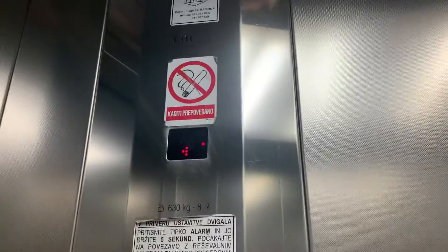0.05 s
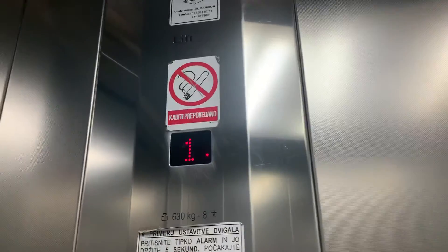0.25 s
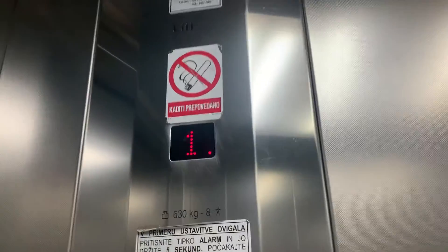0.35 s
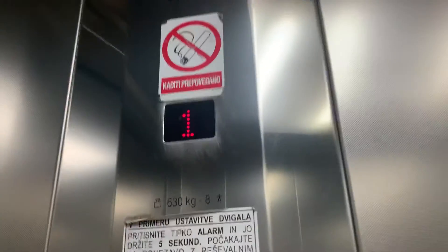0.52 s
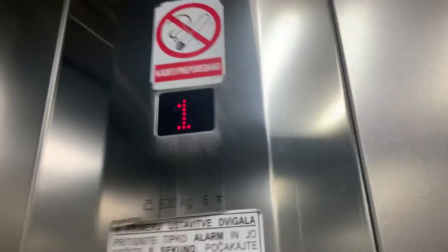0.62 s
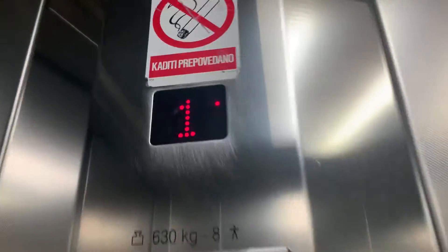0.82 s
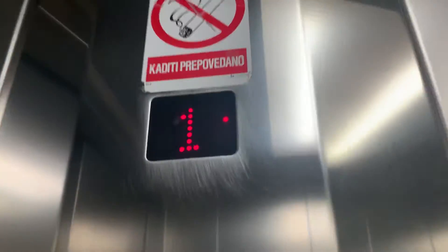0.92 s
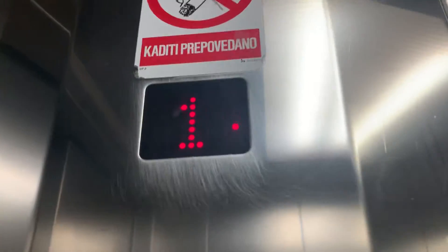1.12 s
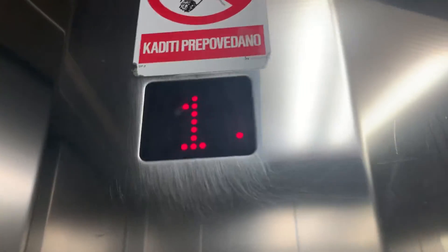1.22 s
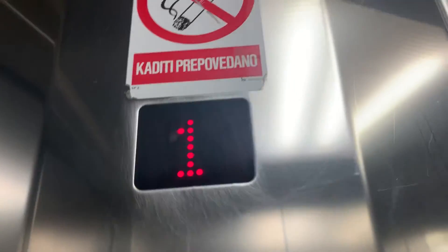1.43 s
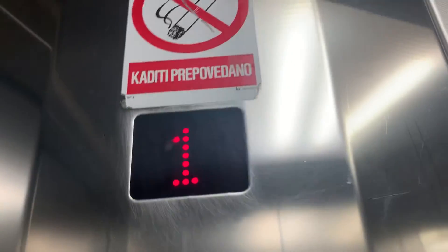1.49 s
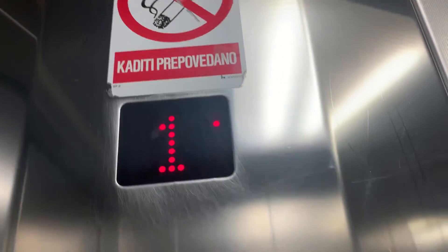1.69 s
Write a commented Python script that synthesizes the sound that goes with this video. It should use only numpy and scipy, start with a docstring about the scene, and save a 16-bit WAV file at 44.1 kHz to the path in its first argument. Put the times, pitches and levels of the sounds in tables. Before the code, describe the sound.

A moving elevator rumbles low, heard from inside its steel cabin. Soft booming thumps and quick clacks and scrapes come first, slightly to the right, then a dull wall panel knock and a few fainter bumps.

```python
"""Riding a steel elevator

From inside the moving cabin: the car rumbles, its travel hisses and the drive hums.
Soft thumps set the cabin booming at its lowest mode, and a wall panel knocks.
A little to the right the mechanism clacks and scrapes and the guides rub and squeak;
the bare metal walls ring in answer. The top octave is dulled."""
import sys
import numpy as np
from scipy import signal
from scipy.fft import rfft, irfft, next_fast_len
from scipy.io import wavfile
from scipy.ndimage import map_coordinates

SR = 44100
rng = np.random.default_rng(int(sys.argv[2]) if len(sys.argv) > 2 else 0)


def put_to_file(sound):
    """Save the sound as 16-bit audio at rate SR, in the file named by the first command-line argument."""
    columns = np.atleast_2d(sound).T  # one column per channel
    safe = np.clip(columns, -1, 1)
    whole_steps = np.round(safe * 32767)
    wavfile.write(sys.argv[1], SR, whole_steps.astype(np.int16))


N = 77175

# The ring of the walls. Each row: frequency in Hz, time to fall 60 dB in seconds.
WALL_T60 = [(200, 0.51), (1500, 0.31), (4500, 0.38), (9000, 0.3), (14000, 0.15)]
# The background across the stereo pair. Each row: frequency in Hz, left-right correlation.
STEREO_LIKENESS = [(30, 0.91), (90, 0.92), (180, 0.98), (350, 0.76), (700, 0.067), (1500, 0), (4000, 0.017),
                   (10000, 0)]
# The shape of the treble. Each row: frequency in Hz, gain in dB.
TREBLE_SHAPE = [(20, -0.5), (10600, -3), (11600, -22), (13600, -10), (15000, -35)]

# The car's rumble, its hiss along the shaft, the treble fizz and the drive's tones.
# Each row: frequency in Hz, level in dB.
RUMBLE_SPECTRUM = [(15, -25), (24, -12.5), (36, -4), (54, -4.5), (66, -7), (88, 1), (102, -4), (132, -13),
                   (157, -11.5), (188, -17), (212, -10.5), (244, -19.5), (295, -23), (365, -19), (430, -24),
                   (495, -19), (545, -31.5), (700, -50.5), (1100, -68), (2000, -120)]
HISS_SPECTRUM = [(400, -10.5), (650, 1), (950, -3), (1250, -3.5), (1500, -3.5), (1800, -7.5), (2500, -10),
                 (4000, -14), (10000, -34.5), (15000, -50)]
FIZZ_SPECTRUM = [(1500, -6.5), (3500, 2), (6000, -5), (10000, -5), (12500, -2), (16000, -35)]
HUM_TONES = [(400, -53.5), (500, -59), (600, -71)]
# How those four swell and fade. Each row: time in seconds, gain in dB.
RUMBLE_ENVELOPE = [(0, -36), (.5, -36.5), (.9, -36), (1.3, -34), (1.5, -38.5), (1.6, -39.5), (1.75, -43.5)]
HISS_ENVELOPE = [(0, -51.5), (.13, -55), (.55, -55), (.8, -55), (.93, -58.5), (1, -58.5), (1.1, -57.5),
                 (1.35, -59), (1.46, -61), (1.62, -65.5), (1.75, -57.5)]
FIZZ_ENVELOPE = [(0, -68), (.5, -66), (.88, -64), (1, -68.5), (1.1, -64.5), (1.36, -71.5), (1.48, -64),
                 (1.6, -76.5), (1.75, -75)]
HUM_ENVELOPE = [(0, 2), (.55, 0), (.9, -5.5), (1.3, -17.5), (1.55, -7.5), (1.75, -4)]

# Faint rubbing. Each row: start and length in seconds, centre and width in Hz, level in dB.
GUIDE_RUBS = [(0.866, 0.085, 1780, 280, -63), (1.384, 0.42, 1140, 390, -62.5),
              (1.5, 0.29, 2850, 300, -73.5)]
# Thin notes. Each row: start and length in seconds, pitch in Hz, level in dB.
GUIDE_SQUEAKS = [(0.485, 0.112, 1590, -60.5), (0.561, 0.133, 361.4, -48.5)]
# The mechanism sliding. Each row: start and length in seconds, level in dB, tilt in dB per octave,
# relative ring of the steel in dB, focus of that ring in Hz.
SLIDES = [(0.069, 0.026, -48, -6, -6.5, 1300), (0.169, 0.074, -50, 0, -11, 1400),
          (0.233, 0.05, -45, 0, -4.5, 4450), (0.284, 0.03, -46, 2, -4.5, 4040),
          (0.375, 0.0635, -51.5, 1, -12, 3300), (0.836, 0.099, -59.5, -1.5, -12, 2200),
          (1.148, 0.029, -48.5, 1.3, -3, 1700), (1.169, 0.033, -45.5, 1, -12, 3150)]
# The steel's resonances. Each row: centre in Hz, width in Hz, level in dB.
STEEL_MODES = [(1314, 41, 11), (2220, 96, -5), (3000, 70, -1), (3340, 66, -3), (4050, 35, 3.5),
               (4400, 83, -0.5), (4400, 44, -12)]
# The mechanism clacking. Each row: start in seconds, level in dB, tilt in dB per octave,
# relative level of the tick in dB.
CONTACTS = [(-.01, -55.5, -3, -7), (0.143, -53.5, 1.5, 11), (0.191, -58.5, -12, -10), (0.295, -66.5, 5, -2),
            (.389, -53, 3.5, 11), (0.404, -56, 0, -1), (0.446, -60, 9, -6), (.593, -53.5, 0, 15),
            (0.603, -57.5, -3, -6), (0.615, -66, -4.5, 3)]
# Scrapes and clacks before their tilt. Each row: frequency in Hz, level in dB.
SCRAPE_SPECTRUM = [(200, 10.5), (600, 8.5), (1300, -2), (2200, -0.5), (4300, -1), (6300, -5), (8500, -11),
                   (10500, -11.5), (13000, -11), (16000, -38)]
CLACK_SPECTRUM = [(200, -16), (700, -6.5), (1500, -5), (3000, -6.5), (4500, -6), (8000, -5.5),
                  (10500, -3.5), (13500, 0.5), (16000, -23)]
# Knocks on a wall panel. Each row: start in seconds, level in dB, rise in seconds.
PANEL_KNOCKS = [(.072, -45.5, 0.0042), (.676, -29.5, 0.019), (.71, -33.5, 0.005), (.785, -36, 0.0088),
                (1.181, -37.5, 0.0067), (1.61, -43.5, 0.0034)]
# That panel's modes. Each row: frequency in Hz, level in dB, time to fall 60 dB in seconds.
PANEL_MODES = [(157.45, -4, 0.7), (178.5, 1.5, 0.54), (205.3, -6.5, 0.55), (228.7, -8.5, 0.31),
               (266, -4, 0.2), (338.6, -1, 0.15), (372.2, -11.5, 0.44)]
# Thumps on the car. Each row: start in seconds, level in dB.
CAR_THUMPS = [(0.124, -35), (0.23, -12), (0.304, -15.5), (.375, -30), (0.416, -20), (0.511, -23.5),
              (0.561, -18.5), (0.614, -22.5), (0.683, -20.5), (.702, -39), (.93, -26), (1.195, -24),
              (1.271, -27.5), (1.448, -32)]


def amp(db):
    """Decibels to gain."""
    return 10 ** (np.asarray(db) / 20)


def unit(x):
    """Scaled to rms 1."""
    return x / np.sqrt(np.mean(np.abs(x) ** 2) + 1e-20)


def clock():
    """Time of each sample in seconds."""
    return np.arange(N) / SR


def along(points, hz):
    """(Hz, value) points joined on a log frequency axis."""
    knots_hz, values = np.transpose(points)
    return np.interp(np.log(hz + 1), np.log(knots_hz + 1), values)


def level(rows):
    """Gain per sample from (seconds, dB) rows."""
    return amp(np.interp(clock(), *np.transpose(rows)))


def pan(db):
    """Left and right gains for a left-minus-right level."""
    return amp(np.array([[db], [-db]]) / 2)


def wobble(rate):
    """A smooth random curve, rate knots a second."""
    knots = rng.standard_normal(int(N * rate / SR) + 4)
    return map_coordinates(knots, [clock() * rate])


def ramp(u):
    """A smooth step from 0 to 1."""
    return np.sin(np.clip(u, 0, 1) * np.pi / 2) ** 2


def held(start, length, rise_s, fall_s):
    """An envelope that rises, holds, and falls once its length is up."""
    t = clock()
    return ramp((t - start) / rise_s) * ramp((start + length - t) / fall_s + 1)


def decay(t, t60):
    """Exponential fall from t = 0."""
    return amp(-60 * np.maximum(t, 0) / t60)


def filtered(x, response):
    """x shaped by a gain that depends on frequency."""
    size = next_fast_len(N + SR // 2)
    hz = np.fft.rfftfreq(size, 1 / SR)
    return irfft(rfft(x, size) * response(hz), size)[..., :N]


def tilted(spectrum, tilt_db):
    """A response of mean power 1: a spectrum sloped by tilt_db per octave above 800 Hz."""
    return lambda hz: unit(amp(along(spectrum, hz) + tilt_db * np.log2(np.maximum(hz, 800))))


def diffuse(spectrum):
    """Noise all round the microphone: left and right alike in the bass, unrelated in the treble."""
    def mid_side(hz):
        angle = np.arccos(np.clip(along(STEREO_LIKENESS, hz), -1, 1)) / 2
        return amp(along(spectrum, hz)) * [np.cos(angle), np.sin(angle)]
    mid, side = filtered(rng.standard_normal((2, N)), mid_side)
    return unit(np.array([mid + side, mid - side]))


def wall_ring():
    """The ring of the steel walls after an impulse; the treble dies first."""
    hz, t, noise = signal.stft(rng.standard_normal((2, SR // 2)), SR, nperseg=256)
    fading = noise * decay(t, along(WALL_T60, hz)[:, None])
    return signal.istft(fading, SR, nperseg=256)[1]


def cabin(x):
    """A mono sound as the walls return it to the stereo pair."""
    walls = wall_ring()
    return signal.fftconvolve(x[None], walls / np.linalg.norm(walls[0]), axes=1)[:, :N]


def travel():
    """The moving car rumbles and hisses along the shaft."""
    rumble = level(RUMBLE_ENVELOPE) * diffuse(RUMBLE_SPECTRUM)
    hiss = level(HISS_ENVELOPE) * diffuse(HISS_SPECTRUM)
    fizz = level(FIZZ_ENVELOPE) * diffuse(FIZZ_SPECTRUM)
    return rumble * pan(db=-0.3) + (hiss + fizz) * pan(db=-1)


def drive_hum(waver_db=1.5, drift_hz=2.2):
    """The drive hums dead centre, each tone wavering in level and pitch."""
    hum = np.zeros(N)
    for hz, db in HUM_TONES:
        gain = amp(db + waver_db * wobble(7.5))
        phase = 2 * np.pi * np.cumsum(hz + drift_hz * wobble(14.37)) / SR
        hum += gain * unit(np.sin(phase))
    return level(HUM_ENVELOPE) * hum


def rubs(edge_s=0.0061):
    """The guides rub and excite faint resonances that fill the cabin."""
    out = np.zeros((2, N))
    for start, length, hz, width_hz, db in GUIDE_RUBS:
        white = diffuse([(20, 0), (16000, 0)])
        band = unit(filtered(white, lambda f: 1 / (1 + (2 * (f - hz) / width_hz) ** 2)))
        out += amp(db) * band * held(start, length, edge_s, edge_s)
    return out


def squeaks(waver=0.0026, jitter=0.017, spread_rad=0.75, flutter_db=2.5, edge_s=0.022, room_db=-12.5):
    """A guide sticks and slips at one pitch: a thin, rough note that the walls smear."""
    out = np.zeros((2, N))
    for start, length, hz, db in GUIDE_SQUEAKS:
        pitch = hz * (1 + waver * wobble(40.4) + jitter * wobble(400))
        phase = 2 * np.pi * np.cumsum(pitch) / SR + spread_rad * np.array([wobble(30), wobble(30)])
        envelope = amp(db + flutter_db * wobble(120)) * held(start, length, edge_s, edge_s)
        note = envelope * unit(np.sin(phase))
        out += note + amp(room_db) * cabin(note[0])
    return out


def steel(focus_hz, focus_octaves=0.17, skirt_db=-17):
    """The steel's response to friction: modes near the focus ring most."""
    def response(f):
        modes = 0
        for hz, width_hz, db in STEEL_MODES:
            share = amp(skirt_db) + 1 / (1 + (np.log2(hz / focus_hz) / focus_octaves) ** 2)
            damping = 1j * f * width_hz
            modes += amp(db) * share * damping / (hz * hz - f * f + damping)
        return unit(modes)
    return response


def scrapes(grain_db=3, direct_db=-5.5):
    """Short slides: grainy friction fills the cabin and rings the steel."""
    out = np.zeros((2, N))
    for start, length, db, tilt_db, ring_db, focus_hz in SLIDES:
        stroke = amp(db) * held(start, length, rise_s=0.018, fall_s=0.011)
        friction = stroke * unit(rng.standard_normal((2, N)) * amp(grain_db * wobble(600)))
        rasp = filtered(friction[0], tilted(SCRAPE_SPECTRUM, tilt_db))
        ring = filtered(friction, steel(focus_hz))
        out += amp(direct_db) * rasp + cabin(rasp) + amp(ring_db) * ring
    return out


def clacks(build_s=0.0049, grain_db=2, rattle_db=1, tick_tilt_db=4, room_db=7):
    """Small hard contacts: a bright tick, then the walls' duller, rattling answer."""
    out = np.zeros((2, N))
    for start, db, tilt_db, tick_db in CONTACTS:
        t = clock() - start
        tick = (t >= 0) * decay(t, t60=0.015) * rng.standard_normal((2, N))
        rattle = amp(grain_db * wobble(700) + rattle_db * wobble(149.2))
        delay = max(round(start * SR), 0)
        ring = np.pad(wall_ring(), ((0, 0), (delay, N)))[:, :N]
        answer = ring * ramp(t / build_s) * rattle
        out += amp(db + tick_db) * filtered(tick, tilted(CLACK_SPECTRUM, tilt_db + tick_tilt_db))
        out += amp(db + room_db) * filtered(answer, tilted(CLACK_SPECTRUM, tilt_db))
    return out


def knocks(spread_rad=0.34):
    """Dull knocks ring the low modes of a wall panel."""
    out = np.zeros((2, N))
    for start, db, rise_s in PANEL_KNOCKS:
        t = clock() - start
        for hz, mode_db, t60 in PANEL_MODES:
            phase = rng.uniform(0, 2 * np.pi) + spread_rad * rng.standard_normal((2, 1))
            envelope = amp(db + mode_db) * ramp(t / rise_s) * decay(t, t60)
            out += envelope * np.sin(2 * np.pi * hz * t + phase)
    return out


def boom(mode_hz=77.76, drift_hz=1.72, rise_s=0.04, t60=0.22):
    """Each thump pumps up the cabin's lowest mode, which then dies away."""
    swing = np.zeros(N)
    for start, db in CAR_THUMPS:
        t = clock() - start
        swing += amp(db) * ramp(t / rise_s) * decay(t - rise_s, t60)
    phase = 2 * np.pi * np.cumsum(mode_hz + drift_hz * wobble(24.57)) / SR
    return swing * np.sin(phase)


def scene():
    """The ride from inside the cabin, with the boom and the mechanism a little to the right."""
    background = travel() + drive_hum()
    body = boom() * pan(db=-3) + knocks()
    mechanism = clacks() + scrapes() + squeaks() + rubs()
    return background + body + mechanism * pan(db=-2)


def record(dry, top_hz=15600):
    """The treble softens above 10.6 kHz and dips sharply near 11.6 kHz; nothing sounds above 15.6 kHz."""
    return filtered(dry, lambda hz: amp(along(TREBLE_SHAPE, hz)) * (hz < top_hz))


dry = scene()
out = record(dry)
put_to_file(out)
```